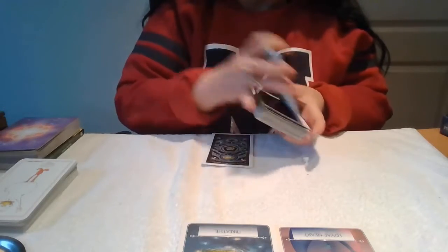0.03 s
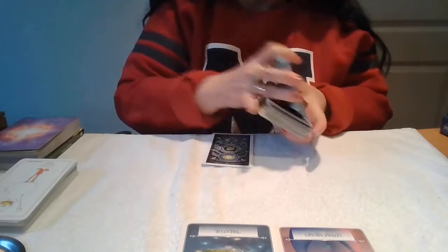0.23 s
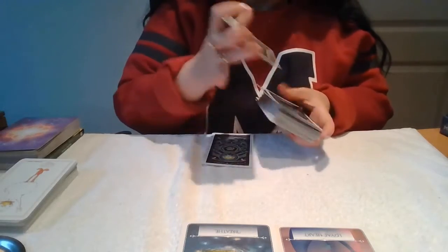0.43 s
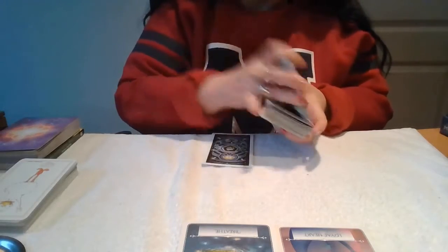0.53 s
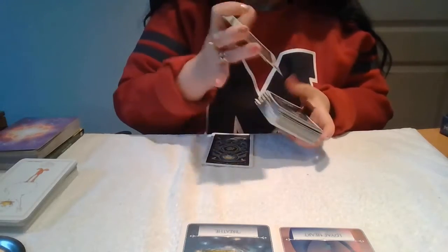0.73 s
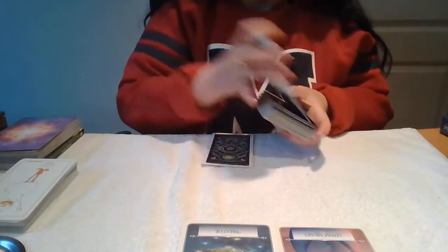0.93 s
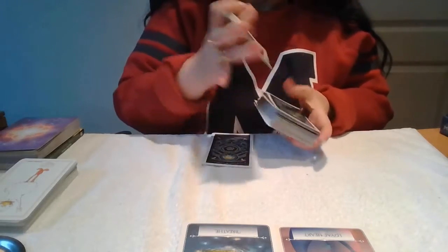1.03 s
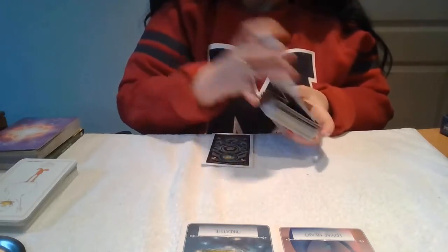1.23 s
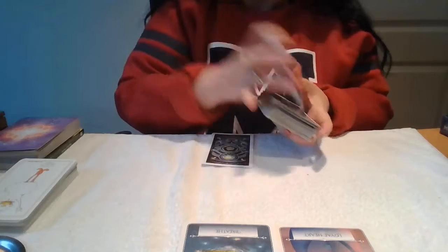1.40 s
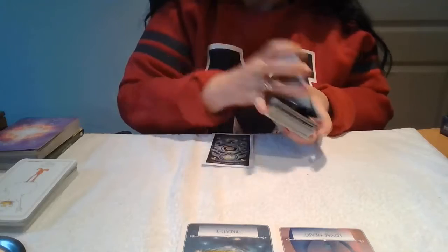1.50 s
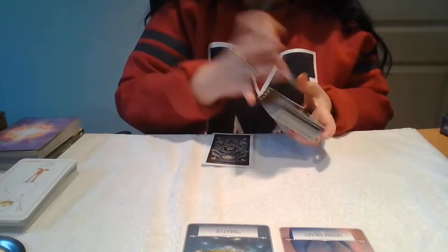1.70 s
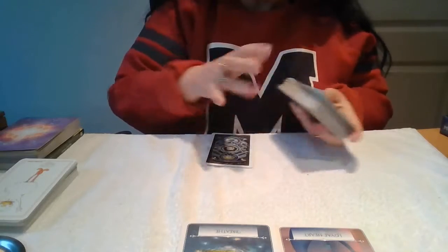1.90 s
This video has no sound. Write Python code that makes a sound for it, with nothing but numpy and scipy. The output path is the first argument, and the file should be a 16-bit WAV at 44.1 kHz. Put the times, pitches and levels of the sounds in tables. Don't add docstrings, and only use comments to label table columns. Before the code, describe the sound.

A thick deck of cards is shuffled overhand, with sharp cracks, papery hisses and soft palm thuds

```python
import sys
import numpy as np
from scipy import signal
from scipy.fft import rfft, irfft
from scipy.io import wavfile
from scipy.ndimage import uniform_filter1d

SR = 44100
rng = np.random.default_rng(int(sys.argv[2]) if len(sys.argv) > 2 else 0)


def volts(x):
    e = np.asarray(x, float) / 20
    return 10 ** e


def pcm_store(signal):
    levels = np.round(np.clip(np.atleast_2d(signal), -1, 1) * 32767)
    wavfile.write(sys.argv[1], SR, levels.astype(np.int16).T)


N = 85995
PRE_S = 0.5
AWAY_DB = -18


def evened(x):
    return x / np.sqrt(np.mean(x ** 2) + 1e-20)


def read(points, hz):
    f, value = np.transpose(points)
    return np.interp(np.log(hz + 1), np.log(f + 1), value)


def add(mix, start_s, sound):
    part = mix[..., round(start_s * SR):][..., :sound.shape[-1]]
    part += sound[..., :part.shape[-1]]


def shaped(x, gain):
    return irfft(rfft(x) * gain(np.fft.rfftfreq(x.shape[-1], 1 / SR)), x.shape[-1])


def filtered(x, order, hz, kind):
    return signal.sosfilt(signal.butter(order, hz, kind, fs=SR, output="sos"), x)


def ring(x, hz, width_hz):
    r = np.exp(-np.pi * width_hz / SR)
    return signal.lfilter([1, 0, -1], [1, -2 * r * np.cos(2 * np.pi * hz / SR), r * r], x)


# frequency in Hz, level in dB.
AIR_COLOUR = [(15, -1.5), (30, 5.5), (150, -20.5), (500, -12), (1000, -26.5), (2000, -35.5), (16000, -45)]


def floor():
    air_db, rumble_db, rumble_hz = -69, -72, 40.3
    air, low = rng.standard_normal((2, 2, N))
    air = evened(shaped(air + air[::-1] * 0.18, lambda f: volts(read(AIR_COLOUR, f))))
    low = evened(shaped(low + low[::-1] * 0.45, lambda f: f / 15 / (1 + (f / rumble_hz) ** 4)))
    return volts(air_db) * air + volts(rumble_db) * low


# frequency in Hz, t60 in seconds.
ROOM_T60 = [(100, 0.37), (400, 0.19), (1040, 0.25), (2760, 0.23), (7280, 0.23), (15000, 0.13)]
# frequency in Hz, level in dB.
ROOM_COLOUR = [(130, -8), (300, -2.5), (2000, -3), (6000, -13), (15000, -9.5)]
# delay in seconds, level in dB, top frequency in Hz.
ECHOES = [
    (.0085, -13.5, 3960),
    (0.014, -19.5, 3000),
    (.0236, -13, 2800),
]


def room(x):
    shared_gain, echo_low_hz = 0.72, 248.6
    taps = np.zeros((3, SR // 2))
    at = np.arange(200, SR // 2 - 20, 20) + rng.integers(0, 20, (3, (SR // 2 - 201) // 20))
    np.put_along_axis(taps, at, rng.choice([-1., 1.], at.shape), 1)
    hz, t, z = signal.stft(taps, SR, nperseg=256)
    decay = volts(-60 * t / read(ROOM_T60, hz)[:, None])
    tail = signal.istft(z * decay, SR, nperseg=256)[1]
    shared = shaped(tail[2], lambda f: shared_gain + .5 / (1 + (f / 900) ** 2))
    tail = shared + shaped(tail[:2], lambda f: 1 / (1 + (120 / (f + 1)) ** 2))
    tail = shaped(tail / np.linalg.norm(tail[0]), lambda f: volts(read(ROOM_COLOUR, f)))
    out = signal.fftconvolve(x, tail, axes=1)[:, :N + SR]
    for delay_s, db, top_hz in ECHOES:
        add(out, delay_s, volts(db) * filtered(x, 1, [echo_low_hz, top_hz], "band"))
    return out


# frequency in Hz, left lead in radians.
PORT_LEAD = [(950, -0.5), (2150, -.7), (3010, -2), (3450, -2), (5600, -1.1), (6890, 0.53), (15000, -0.76)]
# frequency in Hz, share of opposite sign in the two ports (0 to 1).
PORT_APART = [(60, 0.23), (200, 0.17), (500, 0.063), (1300, 0.47), (2500, 0.37), (5000, 0.4), (9000, 0.49),
              (15000, 0.72)]


def ports(pair):
    hz = np.fft.rfftfreq(N + SR, 1 / SR)
    a, b = rfft(pair)
    apart = np.clip(read(PORT_APART, hz), 0, 1)
    same = np.sqrt(1 - apart ** 2)
    lead = np.exp(.5j * read(PORT_LEAD, hz))
    left = (same * a + apart * b) * lead
    right = (same * a - apart * b) / lead
    return irfft(np.array([left, right]), N + SR)


def earlier_slap():
    return -0.09, volts(-29) * rng.standard_normal((2, 300))


# loudest at in seconds, half length in seconds, level in dB, pitch in Hz, width in Hz.
WHISTLES = [(.14, 0.069, -73, 1470, 50), (.37, 0.024, -58, 5000, 210), (0.51, 0.035, -55.5, 4750, 150),
            (.55, 0.033, -60.5, 1727, 86), (0.784, 0.033, -59.5, 5250, 200), (1.02, .04, -51.5, 1398, 154),
            (1.566, .005, -44, 7450, 230), (1.662, 0.018, -46.5, 4400, 170),
            (1.678, 0.0088, -44.5, 2306, 370), (1.898, 0.014, -64, 8950, 300),
            (1.897, 0.011, -55, 13000, 300), (1.94, 0.026, -62, 2130, 140), (1.62, 0.016, -60.5, 1890, 310),
            (.82, 0.029, -56.5, 900, 330), (1.912, 0.01, -56, 620, 250), (.56, 0.036, -61.5, 2620, 180)]


def whistle(peak_s, half_s, level_db, hz, width_hz):
    t = np.arange(-.1, .1, 1 / SR)
    noise = rng.standard_normal((2, len(t)))
    band = evened(ring(ring(noise, hz, width_hz), hz, 2 * width_hz))
    away = np.minimum(abs(t) / half_s, 8)
    return peak_s + t[0], volts(level_db + AWAY_DB * away ** 2) * band


# frequency in Hz, level in dB.
HISS_COLOUR = [(180, 17), (300, -26.5), (814, -8.5), (2250, -9.5), (2400, -6.5), (4590, 1), (5610, -2.5),
               (8360, 4.5), (16000, -1)]
# fastest at in seconds, speed-up in seconds, slow-down in seconds, level in dB, tilt in dB per octave.
SLIDES = [(0.061, 0.01, 0.037, -40.5, 7), (0.086, 0.018, 0.014, -59, -8.5), (.172, 0.057, 0.038, -57, 6),
          (.225, 0.031, 0.067, -56, 6), (0.356, 0.016, 0.028, -38.5, 4.5), (.392, 0.019, 0.014, -54, -4),
          (0.441, 0.034, 0.091, -54.5, 5.5), (.495, 0.037, 0.04, -36.5, 5.5),
          (.661, 0.0085, 0.059, -48, -4), (.78, 0.038, 0.052, -35, 11.5), (.805, 0.037, 0.014, -55.5, -11),
          (.972, 0.0095, 0.12, -50, 0.5), (1.026, 0.054, 0.23, -47.5, -1),
          (1.081, 0.058, 0.079, -42.5, 5.5), (1.105, 0.011, 0.024, -38, -4.5),
          (1.267, 0.011, 0.017, -42, 1), (1.297, 0.045, 0.031, -50.5, -2.5), (1.35, 0.034, 0.079, -45, 5.5),
          (1.569, 0.012, 0.067, -44.5, 2), (1.60, 0.0079, 0.012, -58.5, -9),
          (1.656, 0.027, 0.063, -41, 0.5), (1.679, 0.0071, 0.019, -38, 6.5), (1.9, 0.013, 0.045, -49.5, 10)]


def slide(peak_s, rise_s, fall_s, level_db, tilt_db):
    grain_db, patch_db, low_hz = 3.2, 4.5, 350
    t = np.arange(-.12, .12, 1 / SR)
    noise, grain = rng.standard_normal((2, len(t))), rng.standard_normal(len(t))
    patches = evened(uniform_filter1d(rng.standard_normal(len(t) // 2 + 1), 80))

    def colour(f):
        tilt = tilt_db * np.log2((f + 700) / 8000)
        return f ** 2 / (f ** 2 + low_hz ** 2) * volts(read(HISS_COLOUR, f) + patch_db * patches + tilt)

    hiss = evened(shaped(noise, colour))
    away = np.minimum(np.where(t < 0, -t / rise_s, t / fall_s), 8)
    grain = evened(uniform_filter1d(grain, 60))
    return peak_s + t[0], hiss * volts(level_db + AWAY_DB * away ** 2 + grain_db * grain)


def knock(peak_s, peak_db, hz, t60_s):
    rise_turns, rough = 1.1, .35
    rise_s, t = rise_turns / hz, np.arange(3000) / SR
    push = np.sin(np.pi / 2 * np.minimum(t / rise_s, 1)) ** 2
    shape = push * volts(-60 * np.maximum(t - rise_s, 0) / t60_s)
    sound = volts(peak_db) * shape * np.sin(2 * np.pi * (hz * t + rng.random()))
    uneven = evened(uniform_filter1d(rng.standard_normal((2, len(t))), round(2 * SR / hz), axis=1))
    sound = sound * ([[1], [0]] + rough * uneven)
    return peak_s - rise_s, filtered(sound, 2, hz / 2, "high")


# peak at in seconds, peak in dB, pitch in Hz, t60 in seconds.
FLAPS = [(.2146, -42.5, 897, 0.058), (.2146, -44, 1670, 0.018), (.353, -48, 1440, 0.025),
         (.505, -31, 2600, 0.019), (.506, -45, 1615, 0.05), (.660, -46, 1530, 0.065),
         (.6737, -25.5, 1012, 0.0067), (.6737, -25, 1946, 0.0055), (.7992, -37.5, 960, 0.0043),
         (.9975, -28, 1352, 0.021), (.996, -34.5, 2755, 0.023), (1.0947, -24, 1008, 0.007),
         (1.095, -27, 2006, 0.011), (1.397, -46.5, 2000, 0.024), (.6737, -30, 1420, 0.0065),
         (.674, -43.5, 750, 0.0096), (1.926, -42.5, 2690, 0.013)]


def flap(*row):
    return knock(*row)


# peak at in seconds, peak in
# dB, pitch in Hz, t60 in seconds.
THUDS = [(.088, -53.5, 198, 0.0074), (.2146, -46.5, 392, 0.022), (.2384, -33.5, 527, 0.01),
         (.2384, -39.5, 760, 0.022), (.392, -56, 259, 0.046), (.505, -28, 360, 0.0033),
         (.528, -34, 340, 0.012), (.692, -38, 259, 0.0075), (.799, -38.5, 456, 0.0088),
         (.994, -37.5, 318, 0.027), (1.095, -27.5, 308, 0.0095), (1.0947, -24, 642, 0.013),
         (1.267, -40, 457, 0.0057), (1.2862, -39, 250, 0.0095), (1.3963, -36, 570, 0.013),
         (1.398, -39, 384, 0.018), (1.5872, -33, 241.5, 0.015), (1.6857, -31.5, 531, 0.012),
         (1.686, -54, 255, 0.021), (1.8983, -48, 643, 0.016), (1.916, -47, 578, 0.011),
         (1.422, -47.5, 506, 0.014), (1.286, -40, 175, 0.021), (1.098, -28.5, 900, 0.0062),
         (.24, -46.5, 165, 0.026), (1.899, -50.5, 466, 0.016), (1.905, -48, 260, 0.033)]


def thud(*row):
    return knock(*row)


# peak at in seconds, peak in dB, ring in Hz, contact length in seconds, wide-band share in dB.
CRACKS = [(.0603, -36, 5640, 0.0048, 2), (.2147, -24, 6000, 0.0016, -5.5), (.353, -33, 5060, 0.0035, -4),
          (.3903, -27, 4740, 0.0018, 18), (.505, -13.5, 4830, 0.0031, 20), (.6595, -40.5, 3550, 0.0039, -1),
          (.6733, -11, 3150, 0.00064, -0.5), (.8098, -27.5, 10900, 0.0032, -20),
          (.990, -19.5, 4170, 0.0048, 5), (.9975, -18.5, 4200, 0.0011, 14),
          (1.095, -16.5, 3520, 0.0018, -5.5), (1.1017, -10, 4630, 0.0046, 8),
          (1.2627, -31, 5960, 0.0044, 3), (1.2855, -21.5, 4420, 0.0053, 11.5),
          (1.3977, -32.5, 3550, 0.0036, -13), (1.5869, -31, 5600, 0.00094, 7),
          (1.6482, -40, 4640, 0.00037, -2), (1.6858, -12, 3800, .0006, 20.5),
          (.7712, -31, 5200, 0.0021, 15), (.2375, -39, 5550, 0.00089, 2), (.3475, -45, 5030, .001, 8),
          (.477, -33, 13500, 0.00089, 2), (.6608, -32.5, 3300, .0008, 6.5),
          (.6965, -30.5, 2270, 0.0012, -7), (.81, -41, 2820, .001, -12), (.9675, -33.5, 14100, 0.0025, 2),
          (1.1055, -21, 10500, 0.00075, 3.5), (1.118, -26.5, 2260, 0.0043, -12),
          (1.3335, -40, 8750, 0.0011, -1.5), (1.5722, -34.5, 5620, .0005, 3),
          (1.6018, -42.5, 4110, 0.00092, -6.5), (1.682, -29.5, 9500, 0.0014, -3),
          (1.893, -45.5, 10700, .002, -6), (1.901, -39, 12400, 0.0017, -4),
          (1.6857, -20.5, 12500, .0006, -4.5), (.6737, -18, 7130, 0.0016, -4)]


def crack(peak_s, peak_db, hz, length_s, wide_db):
    rise_s, fall_s, q, wide_low_hz = .0007, .0013, 4.0, 3200
    lead, lead_s = 1.6, .0003
    t = np.arange(-200, 800) / SR
    spray = rng.standard_normal((2, len(t))) * rng.exponential(1, len(t))
    spray *= np.exp(np.minimum(t, 0) / rise_s - np.maximum(t - abs(length_s), 0) / fall_s)
    spray *= 1 + lead * np.exp(-abs(t) / lead_s)
    wide = evened(filtered(spray, 3, wide_low_hz, "high"))
    sound = evened(ring(ring(spray, hz, hz / q), hz, hz / 2)) + volts(wide_db) * wide
    return peak_s + t[0], volts(peak_db) * sound / abs(sound).max()


def cards():
    out = np.zeros((2, N + SR))
    layers = [(WHISTLES, whistle), (SLIDES, slide), (FLAPS, flap), (THUDS, thud), (CRACKS, crack)]
    for table, source in [([()], earlier_slap)] + layers:
        for row in table:
            start_s, sound = source(*row)
            add(out, start_s + PRE_S, sound)
    return filtered(out, 2, 70, "high")


def scene():
    direct = ports(cards())
    first = round(PRE_S * SR)
    return (direct + room(direct))[:, first:first + N] + floor()


# frequency in Hz, width in Hz, level in dB.
PORT_RINGS = [(2744, 150, 6), (5226, 810, 7.5), (9500, 3100, -0.5), (15200, 1700, 0)]


def microphone(x):
    def gain(f):
        return volts(sum(db / (1 + ((f - hz) / width_hz * 2) ** 2) for hz, width_hz, db in PORT_RINGS))

    limit = signal.firwin(255, 16050, window=("kaiser", 5), fs=SR)
    return signal.oaconvolve(shaped(x, gain), limit[None], "same")


def roll_off(x):
    return signal.sosfilt(signal.butter(12, 16970, fs=SR, output="sos"), x)


def record(dry):
    mix = microphone(dry)
    return roll_off(mix)


dry = scene()
out = record(dry)
pcm_store(out)
```